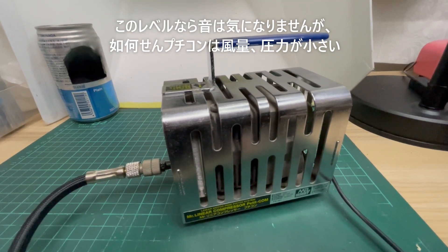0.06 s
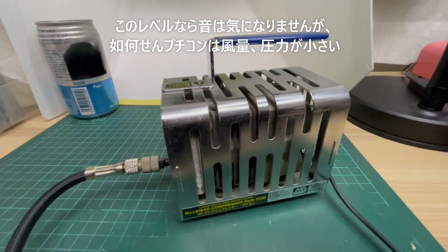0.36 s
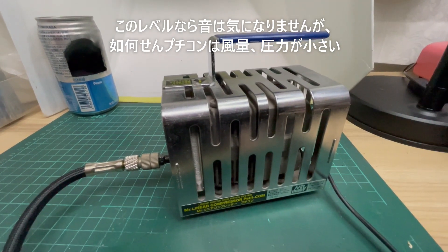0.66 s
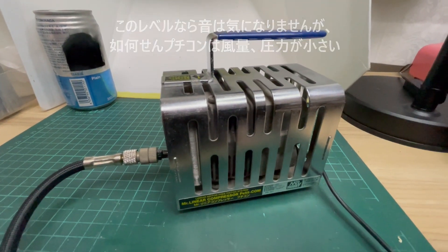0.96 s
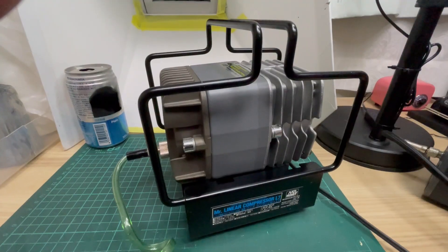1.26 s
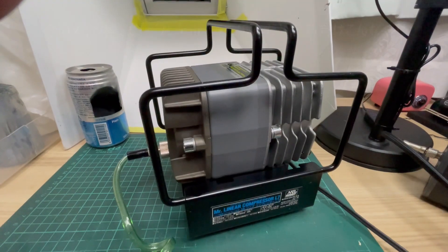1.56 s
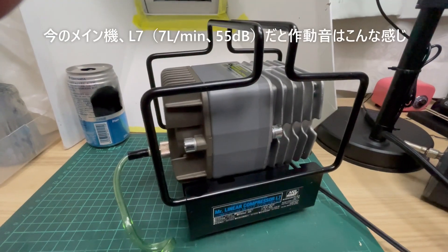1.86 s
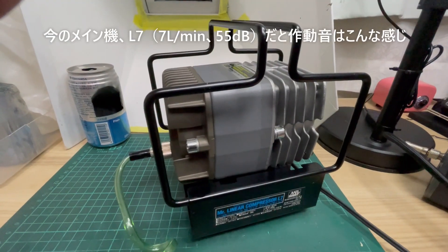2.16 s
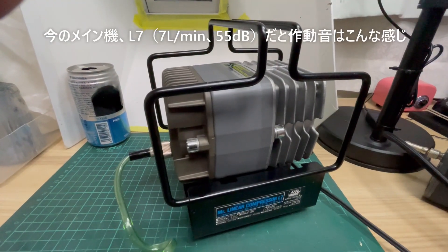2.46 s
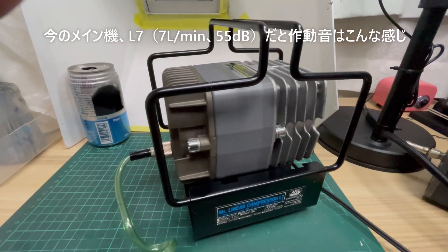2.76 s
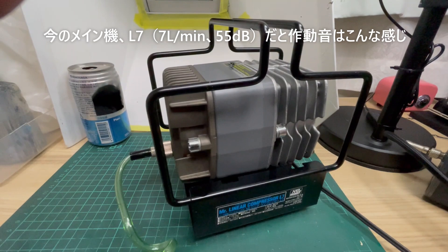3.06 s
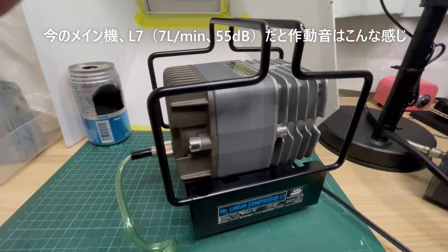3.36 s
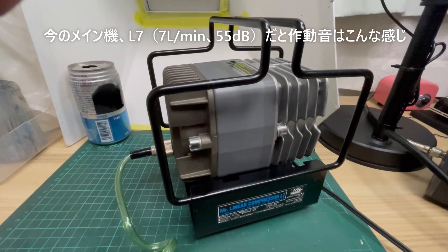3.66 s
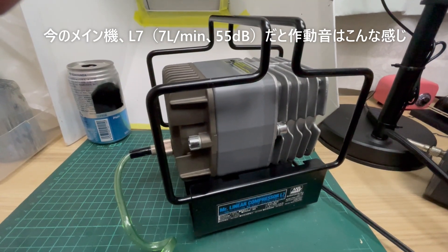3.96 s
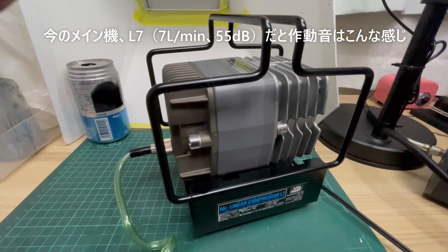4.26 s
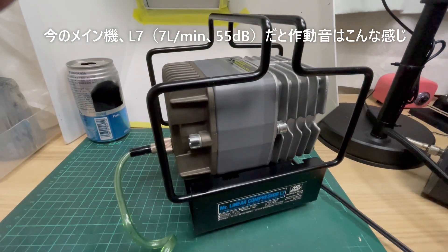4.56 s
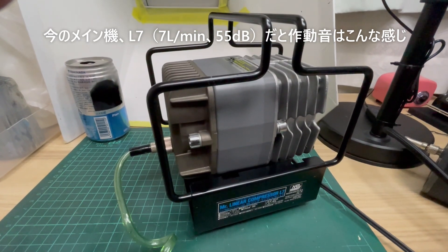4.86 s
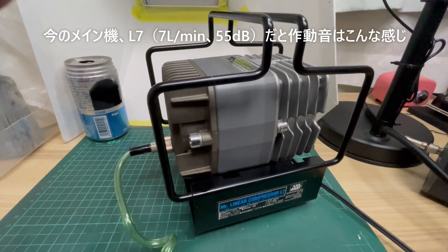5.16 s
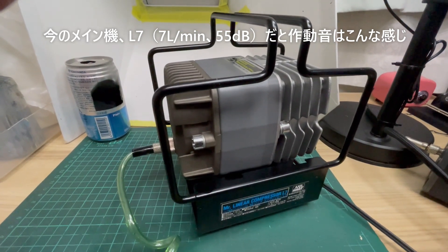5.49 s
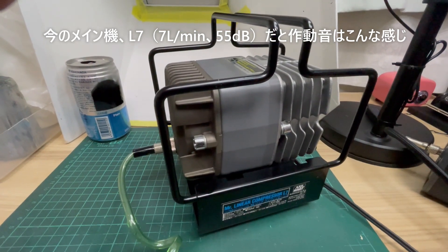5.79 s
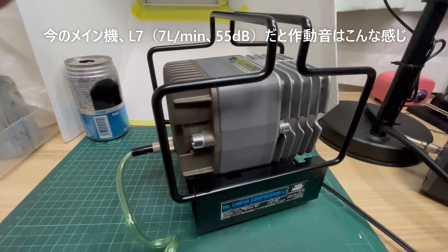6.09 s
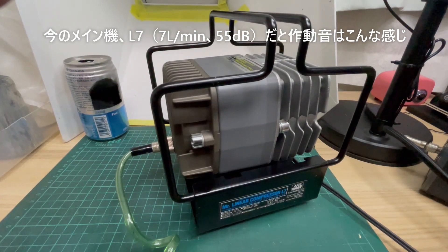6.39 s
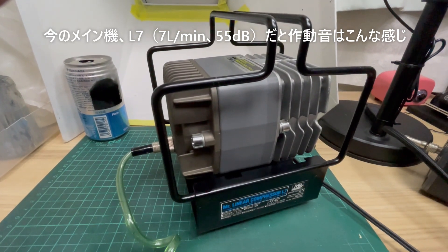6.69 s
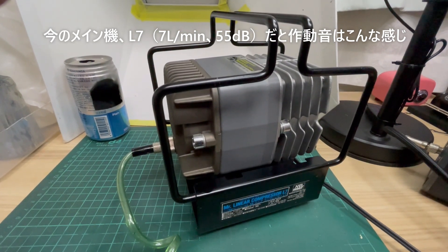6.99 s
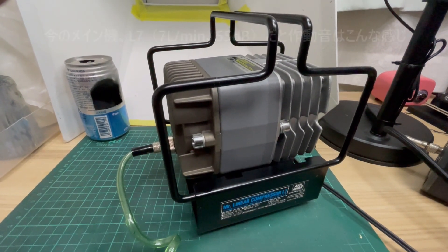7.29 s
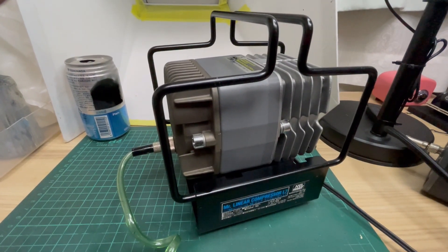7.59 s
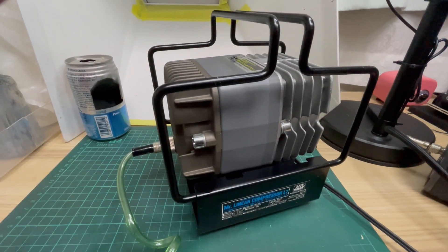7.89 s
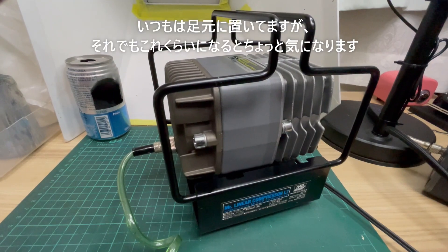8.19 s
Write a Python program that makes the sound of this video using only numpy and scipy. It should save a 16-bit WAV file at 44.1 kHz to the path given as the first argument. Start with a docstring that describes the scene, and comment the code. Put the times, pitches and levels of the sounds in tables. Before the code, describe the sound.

A small air compressor purrs softly and is switched off with a click. A bigger one snaps on with a few quick knocks, then runs with a louder low hum, pulsing air hiss and valve buzz that changes tone as pressure builds. It clicks off, pauses about a second, and starts again. A room fan whirs faintly throughout, heard close up in a small room, slightly to the left.

```python
"""Two linear-piston airbrush compressors on a workbench, one stroke per 50 Hz mains cycle.
Pistons hum; valves puff, buzz and ring the housings. The small unit purrs and is switched off.
The big one is switched on, hums and buzzes harder as pressure builds, is switched off,
and restarts under pressure. A room fan runs throughout. The sound dips out briefly before each start."""
import sys
import numpy as np
from scipy import signal
from scipy.fft import rfft, irfft, next_fast_len
from scipy.io import wavfile

SR = 44100
rng = np.random.default_rng(int(sys.argv[2]) if len(sys.argv) > 2 else 0)


def master(y):
    """Save y as 16-bit WAV."""
    cut = np.clip(np.atleast_2d(y).T, -1, 1)
    pcm = np.round(cut * 32767)  # scale
    wavfile.write(sys.argv[1], SR, pcm.astype(np.int16))


N = 363384
T = np.arange(N) / SR
FFT_SIZE = next_fast_len(N)
FREQS_HZ = np.maximum(np.arange(FFT_SIZE // 2 + 1) * SR / FFT_SIZE, 1)
MAINS_HZ, SMALL_OFF_S = 50.05, .695

# stereo tilt, mostly to the left: (frequency [Hz], left-right [dB])
TILT = [(100, 5.5), (600, 4), (1500, 8.5), (5000, 5), (7000, 10), (9000, -1.5), (14000, 0)]
# brief dips: (time [s])
DIPS_S = [1.175, 7.574]

# small unit's hum: (order, level [dB])
SMALL_HUM = [(1, -50.5), (2, -46.5), (3, -56), (4, -57), (5, -72), (6, -67)]
# its stereo image, per order: (left-right [dB], left lead [rad])
SMALL_HUM_SIDES = [(4, 1.6), (-9, -.4), (2, 1.4), (13, 1.4), (4, -1.8), (10, -1.1)]
# valve openings, small unit: (place [cycles], decay [cycles], relative level [dB])
VALVES_SMALL = [(0.94, 0.23, 0.12), (0.6, 0.38, -1.6)]
# small case's spectrum: (frequency [Hz], relative level [dB])
SMALL_SPECTRUM = [(250, -6), (500, 15.5), (1000, 5), (2300, 2), (3300, 0.5), (4200, -13), (6000, -8.5),
                  (7000, -10.5), (9200, -11), (10000, -8), (12500, -6.5), (13500, -23)]
# its modes: (frequency [Hz], width [Hz], gain [dB])
SMALL_MODES = [(2780, 130, 7.4), (2220, 47, 11), (3360, 65, 5.8), (3550, 26, 9.7), (5260, 44, 8.5),
               (7220, 150, 18), (8540, 170, 14)]

# fan rush before and after the first dip: (frequency [Hz], relative level [dB])
FAN_EARLY_SPECTRUM = [(25, -22), (45, 1), (130, 1.5), (340, -0.5), (460, -4), (720, 0), (1000, -6),
                      (1900, -12), (3000, -21), (4200, -27.5), (6000, -32), (8500, -35), (13000, -48)]
FAN_LATE_SPECTRUM = [(25, -37), (45, -5), (130, -3), (340, -1), (460, -6.5), (790, -6), (1080, -17.5),
                     (1900, -12.5), (3000, -21), (4400, -28.5), (5600, -40), (8500, -41), (13000, -49.5)]
# fan modes: (frequency [Hz], width [Hz], gain [dB])
FAN_MODES = [(706, 68, 7.3), (1738, 97, 7.1), (2880, 200, 3.5), (3940, 76, 3), (7700, 210, 6),
             (9640, 410, 9)]
# blade tones: (order, base level [dB])
BLADE_TONES = [(1, -58.5), (2, -65.5), (3, -68.5), (4, -62.5), (6, -94)]
# their envelope: (time [s], gain [dB])
BLADE_ENVELOPE = [(0.3, -2), (1.0, 0.5), (1.55, -3), (2.5, -2), (5.0, -3), (7.1, -3.5)]

# switch clicks: (time [s], level [dB], t60 [s], left-right [dB], kind)
# kinds: 0 hollow clack, 1 bright snap on, 2 snap off, 3 dull press
CLICKS = [(.6917, -24, .014, 0, 0), (1.6660, -21, .014, -5, 1), (6.7085, -32.5, .018, 0, 3),
          (6.7229, -23.5, .014, 0, 2), (7.6425, -51, .015, -6, 2), (7.7225, -16.5, .007, -5, 1)]
# contact bounces: (delay [s], strength)
BOUNCES = [(.0003, 2.2), (.001, 1.4), (.0015, .7)]
# click spectrum, per kind: (frequency [Hz], relative level [dB])
SWITCH_SPECTRA = [
    [(500, -24), (1150, -16), (1550, -6), (2400, -5), (4000, -14), (6200, -6), (8500, -8), (11000, -4),
     (14000, -17)],
    [(500, -30.5), (2000, -20.5), (3800, -21), (5000, -7), (6500, -19), (7800, 1), (8500, 5), (9500, 1.5),
     (11500, -8.5), (14000, -11)],
    [(500, -18), (1400, -13), (2200, -8), (3000, -2), (4500, -1), (6500, -1), (7900, -1), (9500, -10),
     (12200, -5), (14000, -16)],
    [(500, -12), (2000, -4), (3000, -12), (5000, -6), (14000, -16)],
]
# shell modes, per kind: (frequency [Hz], width [Hz], gain [dB])
SWITCH_MODES = [
    [(1600, 400, 17), (2380, 380, 16), (5400, 500, 2), (10700, 1000, 6)],
    [(5050, 350, 6), (8500, 900, 3), (11300, 1200, 4)],
    [(5100, 900, 3), (7950, 300, 9), (12300, 400, 6)],
    [(1920, 330, 15)],
]
# free swings of piston and frame: (time [s], frequency [Hz], level [dB], t60 [s])
SWINGS = [(0.696, 86, -38, 0.31), (1.725, 267, -40, 1.34), (1.715, 163, -40.5, 0.52),
          (1.715, 311, -46, 0.26), (6.74, 66.6, -28, 0.17), (7.763, 72, -32.5, 0.29)]

# big unit's runs: (on [s], off [s], air surge [dB])
RUNS = [(1.698, 6.728, 8.5), (7.743, 9.0, 3)]
# its hum, running free, loaded, and added while lopsided:
# (order, level [dB], left-right [dB], left lead [rad])
HUM_EMPTY = [(1, -34.5, 1.5, 1.48), (2, -42.5, 10, 1.1), (3, -45.5, 6.5, 2.5), (4, -58.5, 2.5, -1),
             (5, -55, 10, 3), (6, -55.5, 10.5, -2), (7, -62.5, 4, -1)]
HUM_FULL = [(1, -31, 5, 2.5), (2, -47.5, -4, 3.5), (3, -46.5, 15, -2.4), (4, -55.5, 10.5, -0.6),
            (5, -51, 5, 0.69), (6, -60, 6, 0.84), (7, -68, 2.5, 1.3)]
HUM_LOPSIDED = [(2, -47, 8, -0.39), (4, -48.5, 15, -0.73), (6, -53.5, 11.5, -0.13), (7, -68, -7, -0.077)]
# valve openings by pressure, exhaust then intake: (place [cycles], decay [cycles], relative level [dB])
VALVES_EMPTY = [(.16, .42, 0), (0.671, 0.25, 0.5)]
VALVES_HALF = [(0.179, 0.42, 0), (0.691, 0.42, 0)]
VALVES_FULL = [(0.122, 0.38, -3.5), (.62, 0.27, -7)]
# air rush and valve buzz: (frequency [Hz], relative level [dB])
AIR_SPECTRUM = [(100, 13), (300, 6), (470, -0.5), (750, 3.5), (1000, -3.5), (2000, 4.5), (3400, 0.5),
                (5000, 2.5), (6200, -0.5), (7200, 0.5), (8600, 3.5), (10500, 2), (12000, 2), (13000, 0),
                (14000, -6)]
BUZZ_SPECTRUM = [(330, 1.5), (460, 3), (650, 8), (1000, -0.5), (1300, -1), (2100, -1.5), (3400, -3),
                 (4600, 3.5), (5500, -3.5), (7000, -1), (9000, -1.5), (10700, -7.5), (11700, -4.5),
                 (13000, 2), (14000, -7.5)]
# head and housing modes, for the air and by pressure: (frequency [Hz], width [Hz], gain [dB])
AIR_MODES = [(2980, 200, 3.5), (5000, 300, 5.5), (6020, 220, 6.5), (8500, 280, 3.5), (9800, 110, 1.5),
             (11600, 150, 10), (13720, 180, 9)]
EMPTY_MODES = [(646, 35, 8), (885, 160, 6.5), (1265, 87, 5), (2050, 42, 10.5), (2280, 41, 12.5),
               (2755, 120, 9.5), (3430, 65, 9), (3847, 83, 12.5), (4446, 65, 10), (4895, 96, 12),
               (6100, 72, 13), (6650, 49, 11.5)]
HALF_MODES = [(1283, 200, 9.5), (2098, 82, 8), (2750, 90, 9), (3850, 130, 6), (4420, 170, 10),
              (4800, 120, 7), (5300, 220, 7), (5970, 120, 9), (6060, 95, 9), (6270, 100, 13.5),
              (6580, 90, 14), (6660, 54, 6), (7370, 150, 9)]
FULL_MODES = [(1250, 120, 6), (2000, 200, 5), (2720, 50, 8), (2900, 130, 4), (4500, 130, 6), (4850, 120, 3),
              (5300, 200, 4), (5930, 110, 9), (6155, 50, 6), (6800, 60, 6), (7050, 70, 6), (7160, 70, 7),
              (7270, 70, 8), (8550, 200, 6)]
# modes of cylinder head and exhaust chatter: (frequency [Hz], width [Hz], gain [dB])
HEAD_MODES = [(2765, 120, -5), (3860, 90, -2), (4910, 130, -2), (5970, 100, 6)]
CHATTER_MODES = [(5980, 130, 3), (6550, 110, 0), (6800, 110, 0), (7220, 130, 1)]
# chattering valve's two hits per stroke: (place [cycles])
CHATTER_PLACES = [.14, .292]

# piston knocks: (time [s], level [dB])
KNOCKS = [(1.7215, -33), (1.7400, -30.5), (1.761, -37), (1.782, -43), (1.8215, -39), (1.842, -41),
          (7.7765, -42), (7.796, -43)]
# their spectrum: (frequency [Hz], relative level [dB])
KNOCK_SPECTRUM = [(150, -1), (400, 0), (900, -3), (1500, -15), (4500, 7), (7000, 3), (9500, 4), (14000, -6)]
# their modes: (frequency [Hz], width [Hz], gain [dB])
KNOCK_MODES = [(295, 24, 18), (410, 40, 4.7), (900, 79, 8), (2750, 130, 7.3), (4720, 220, 10),
               (12500, 150, 9)]
# reed tones: (peak time [s], half width [s], frequency [Hz], base level [dB], 0 exhaust / 1 intake)
REED_SWELLS = [(3.05, .45, 6258, -68, 1), (3.3, .7, 6557, -64, 1), (5.3, .7, 6557, -55.5, 0),
               (5.5, .9, 6806, -65, 0), (6.0, 2.5, 4454.45, -67, 0)]


def amp(db):
    """Decibels to gain."""
    return 10 ** (np.asarray(db) / 20)


def unit_rms(x):
    """Scale to rms 1."""
    return x / np.sqrt(np.mean(x ** 2) + 1e-20)


def pan(db):
    """Stereo gains for a left-right difference."""
    return amp(np.array([[.5], [-.5]]) * db)


def curve_db(points):
    """Spectrum table on the frequency grid."""
    hz, db = np.transpose(points)
    return np.interp(np.log(FREQS_HZ), np.log(hz), db)


def filtered(x, gain):
    """Apply a frequency response."""
    return irfft(rfft(x, FFT_SIZE) * gain, FFT_SIZE)[..., :N]


def resonance(hz, width_hz):
    """One mode, peak gain 1."""
    return 1 / (1 + 1j * (FREQS_HZ ** 2 - hz ** 2) / (FREQS_HZ * width_hz))


def response(spectrum, modes=()):
    """Stereo response of a spectrum plus modes; mean power 1."""
    body = 1 + sum((amp(db) - 1) * resonance(hz, width_hz) for hz, width_hz, db in modes)
    gain = amp(curve_db(spectrum)) * body * pan(curve_db(TILT))
    return gain / np.sqrt(np.mean(np.abs(gain) ** 2))


def colour(x, spectrum, modes=()):
    """Excitation through a spectrum plus modes; rms 1."""
    return unit_rms(filtered(x, response(spectrum, modes)))


def noise(correlation=0.24):
    """White stereo noise."""
    mid, side = rng.standard_normal((2, N))
    return np.sqrt((1 + correlation) / 2) * mid + np.sqrt((1 - correlation) / 2) * side * [[1], [-1]]


def drift(rate_hz):
    """Slow random wander; rms 1."""
    return unit_rms(filtered(rng.standard_normal(N), 1 / (1 + (FREQS_HZ / rate_hz) ** 2) ** 2))


def gate(on_s, off_s, rise_s, t60_s):
    """Linear rise, hold, exponential decay."""
    return np.clip((T - on_s) / rise_s, 0, 1) * amp(-60 * np.maximum(T - off_s, 0) / t60_s)


def swell(peak_s, half_width_s):
    """Gaussian envelope."""
    return np.exp(-((T - peak_s) / half_width_s) ** 2)


def hum_line(order, db, balance_db, lead_rad, dispersion_rad=4.96, place_cycles=.7):
    """Stroke harmonic: the frame delays high orders; standing waves set each side's level and lag."""
    phase = 2 * np.pi * order * (MAINS_HZ * T - place_cycles) - dispersion_rad * (order - 1) ** 2
    return np.sqrt(2) * amp(db) * pan(balance_db) * np.cos(phase - np.array([[0], [lead_rad]]))


def valve_flow(cycle, valves, opening_cycles=0.023, echo_db=-7.5):
    """Each valve snaps open once a stroke and its flow tails off; room echo fills the gaps."""
    power = amp(echo_db) ** 2
    for place, decay, db in valves:
        age = (cycle - place) % 1
        puff = amp(db) * (1 - np.exp(-age / opening_cycles)) * np.exp(-age / decay)
        power = power + puff ** 2
    return unit_rms(np.sqrt(power))


def valve_buzz(valves, size=8192, line_count=300, jitter_s=7e-6):
    """The same rattle every stroke gives a comb of lines; jitter blurs the highest."""
    cycle = np.arange(size) / size
    grit = rng.standard_normal((2, size)) + .5 * rng.standard_normal(size)
    lines = rfft(grit * valve_flow(cycle, valves) ** 2)[:, :line_count]
    stroke = irfft(lines / np.abs(lines), size)
    place = MAINS_HZ * (T + jitter_s * drift(40)) % 1
    return unit_rms(np.array([np.interp(place, cycle, side) for side in stroke]))


def valve_ping(place, modes, uneven_db=1.2, jitter_s=6e-6, left_lag_s=.00031):
    """A valve slaps its seat once a stroke and rings the housing."""
    strokes = np.floor(MAINS_HZ * (T + jitter_s * drift(40)) - place)
    slaps = np.diff(strokes, prepend=strokes[0]) * amp(uneven_db * drift(33))
    body = sum((-1) ** k * amp(db) * resonance(hz, width) for k, (hz, width, db) in enumerate(modes))
    lag = np.exp(-2j * np.pi * FREQS_HZ * np.array([[left_lag_s], [0]]))
    return unit_rms(filtered(slaps, body * lag * pan(curve_db(TILT))))


def small_compressor(buzz_db=-57.0, air_db=-62.5, ping_db=-69.5):
    """Soft double-mains hum; valves tick in a slotted steel case."""
    hum = sum(hum_line(*line, *sides) for line, sides in zip(SMALL_HUM, SMALL_HUM_SIDES))
    buzz = amp(buzz_db) * valve_buzz(VALVES_SMALL)
    air = amp(air_db) * noise() * valve_flow(MAINS_HZ * T, VALVES_SMALL)
    case = np.std(buzz + air) * colour(buzz + air, SMALL_SPECTRUM, SMALL_MODES)
    pings = amp(ping_db) * sum(valve_ping(place, SMALL_MODES[:1]) for place, _, _ in VALVES_SMALL)
    return (hum + case + pings) * gate(-1, SMALL_OFF_S, rise_s=.03, t60_s=0.078)


def fan(early_db=-52.0, late_db=-54.0, blade_hz=172.9, waver_db=3.0, wander=0.0038):
    """Air rush, softer after the first dip, with wavering blade tones."""
    early = amp(early_db) * colour(noise(0.17), FAN_EARLY_SPECTRUM, FAN_MODES)
    late = amp(late_db) * colour(noise(0.21), FAN_LATE_SPECTRUM, FAN_MODES)
    phase = 2 * np.pi * np.cumsum(blade_hz * (1 + wander * drift(14.3))) / SR
    envelope_db = np.interp(T, *np.transpose(BLADE_ENVELOPE))
    blades = sum(np.sqrt(2) * amp(db + envelope_db + waver_db * drift(7.1)) * np.sin(order * phase)
                 for order, db in BLADE_TONES)
    return np.where(T < DIPS_S[0], early, late) + blades * pan(5.5)


def switches(room_db=-23.5, room_t60_s=0.14):
    """Bouncing contact, brief shell chatter, small-room tail."""
    out = 0
    for s, db, t60_s, balance_db, kind in CLICKS:
        contact = sum(strength * (np.arange(N) == int((s + delay) * SR)) for delay, strength in BOUNCES)
        chatter = .7 * gate(s, s, 0.0007, t60_s)
        tail = amp(room_db) * np.sqrt(t60_s / 0.0052) * gate(s, s, 0.0028, room_t60_s)
        snap = contact + noise() * np.hypot(chatter, tail)
        shell = response(SWITCH_SPECTRA[kind], SWITCH_MODES[kind])
        out = out + amp(db) * pan(balance_db) * filtered(snap, shell)
    return out


def swings(rise_s=0.0015):
    """Switching sets the sprung piston and the frame swinging at their own pitches."""
    return pan(7.8) * sum(amp(db) * gate(s, s, rise_s, t60_s) * np.sin(2 * np.pi * hz * (T - s))
                          for s, hz, db, t60_s in SWINGS)


def rustle(db=-73.5):
    """Faint high rustle after the small unit stops."""
    hiss = colour(noise(), [(3000, -20), (8500, 4), (12000, -2), (14000, -11)])
    return amp(db) * swell(1.07, .08) * hiss


def big_hum(pressure, lopsided_power=0.89):
    """Free swing turns to loaded, lopsided on the way; higher orders oppose and pass through nulls."""
    free = sum(hum_line(*row) for row in HUM_EMPTY)
    loaded = sum(hum_line(order, *rest) * (-1 if order > 2 and round(order) % 2 else 1)
                 for order, *rest in HUM_FULL)
    lopsided = sum(hum_line(order, *rest) * (-1 if order > 2 else 1) for order, *rest in HUM_LOPSIDED)
    skew = 27 / 4 * pressure ** 2 * (1 - pressure)  # peaks at 1
    return (1 - pressure) * free + pressure * loaded + skew ** lopsided_power * lopsided


def air_rush(choke, surge_db, empty_db=-50.5, full_db=-53, sizzle_db=-7.0, sizzle_hz=12440):
    """Air puffs through the valves and sizzles in a narrow band at their edges."""
    cycle = MAINS_HZ * T
    flow = (1 - choke) * valve_flow(cycle, VALVES_EMPTY) + choke * valve_flow(cycle, VALVES_FULL)
    rush = colour(noise() * flow, AIR_SPECTRUM, AIR_MODES)
    sizzle = unit_rms(filtered(noise() * flow, resonance(sizzle_hz, width_hz=210) ** 2))
    return amp(empty_db + (full_db - empty_db) * choke + surge_db) * (rush + amp(sizzle_db) * sizzle)


def big_rattle(choke, surge_db, empty_db=-48, full_db=-50.5, surge_share=0.28, uneven_db=0.9):
    """Valve rattle, uneven in strength; pattern and modes crossfade with pressure."""
    level_db = empty_db + (full_db - empty_db) * choke + surge_share * surge_db + uneven_db * drift(25)
    stages = [(VALVES_EMPTY, EMPTY_MODES), (VALVES_HALF, HALF_MODES), (VALVES_FULL, FULL_MODES)]
    out = 0
    for k, (valves, modes) in enumerate(stages):
        share = np.sqrt(np.clip(1 - np.abs(2 * choke - k), 0, 1))
        out = out + share * colour(valve_buzz(valves), BUZZ_SPECTRUM, modes)
    return amp(level_db) * out


def valve_slaps(choke, empty_db=-61.5, half_db=-55.0, full_db=-58.5):
    """The intake slaps hardest part way up to pressure, the exhaust at full pressure."""
    intake_empty = amp(empty_db) * (1 - choke) * valve_ping(VALVES_EMPTY[1][0], EMPTY_MODES)
    intake_half = amp(half_db) * np.sin(np.pi * choke) * valve_ping(VALVES_HALF[1][0], HALF_MODES)
    exhaust = amp(full_db) * choke ** 2 * valve_ping(VALVES_FULL[0][0], FULL_MODES)
    return intake_empty + intake_half + exhaust


def head_ticks(choke, intake_db=-52, exhaust_db=-57, chatter_db=-58):
    """Valves ring the head: intake when empty, exhaust under pressure, one spell of bright chatter."""
    intake = amp(intake_db) * (1 - choke) ** 2 * valve_ping(VALVES_HALF[1][0], HEAD_MODES, uneven_db=2.5)
    exhaust = amp(exhaust_db) * np.sqrt(choke) * valve_ping(VALVES_FULL[0][0], HEAD_MODES[:1])
    chatter = sum(valve_ping(place, CHATTER_MODES) for place in CHATTER_PLACES)
    return intake + exhaust + amp(chatter_db) * swell(5.5, 0.94) * chatter


def big_compressor(fill_s=1.47, fill_steepness=1.8, choke_power=1.7, surge_s=0.52):
    """Rising pressure chokes the air rush and leaves the valves buzzing and pinging."""
    age_s = np.maximum(T - RUNS[0][0], 0)
    pressure = 1 - np.exp(-(age_s / fill_s) ** fill_steepness)  # 0 empty, 1 full; held through the pause
    choke = pressure ** choke_power
    surge_db = sum(db * (T >= on) * np.exp(-np.maximum(T - on, 0) / surge_s) for on, _, db in RUNS)
    hum = big_hum(pressure) + hum_beat(choke)
    valves = air_rush(choke, surge_db) + big_rattle(choke, surge_db)
    valves += valve_slaps(choke) + head_ticks(choke) + reeds()
    hum_gate = sum(gate(on, off, rise_s=0.028, t60_s=0.28) for on, off, _ in RUNS)
    valve_gate = sum(gate(on, off, rise_s=0.019, t60_s=0.24) for on, off, _ in RUNS)
    return hum * hum_gate + valves * valve_gate


def knocks(rise_s=0.0008, t60_s=0.023):
    """On its first strokes the piston overshoots and hits the head."""
    blows = sum(amp(db) * gate(s, s, rise_s, t60_s) for s, db in KNOCKS)
    return filtered(noise() * blows, response(KNOCK_SPECTRUM, KNOCK_MODES))


def hum_beat(choke, hz=97.4, db=-63.0):
    """Under pressure a faint tone beats against the hum's second order."""
    return np.sqrt(2) * amp(db) * choke * np.sin(2 * np.pi * hz * T)


def reeds(gain_db=-1.0, waver_db=1.5):
    """Each valve reed sings while open; pitches come and go."""
    flows = [valve_flow(MAINS_HZ * T, [valve], echo_db=-11) for valve in (VALVES_FULL[0], VALVES_HALF[1])]
    song = sum(amp(db) * swell(s, half_width_s) * flows[valve] * np.sin(2 * np.pi * hz * T)
               for s, half_width_s, hz, db, valve in REED_SWELLS)
    return amp(gain_db - waver_db * drift(8.8)) * song * pan(18)


def scene():
    """Both compressors, their switches and the fan."""
    return small_compressor() + big_compressor() + swings() + knocks() + switches() + rustle() + fan()


def record(dry, fade_s=0.035, fade_power=1.72, highpass_hz=35, lowpass_hz=14100):
    """Two dips to near silence, then band limiting."""
    for s in DIPS_S:
        dry = dry * np.clip(np.abs(T - s) / fade_s, .03, 1) ** fade_power
    dry = signal.sosfilt(signal.butter(4, highpass_hz, "high", fs=SR, output="sos"), dry)
    return signal.sosfilt(signal.ellip(8, .2, 70, lowpass_hz, fs=SR, output="sos"), dry)


dry = scene()
out = record(dry)
master(out)
```